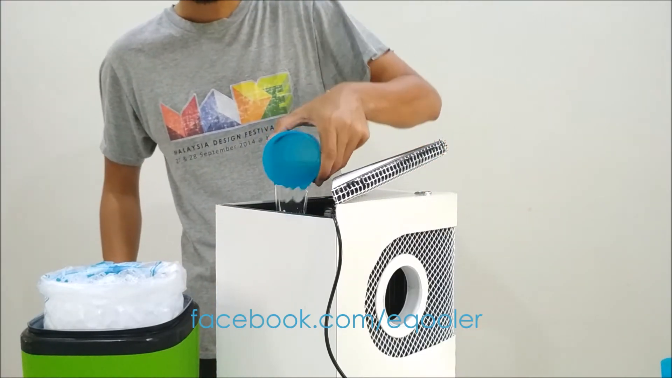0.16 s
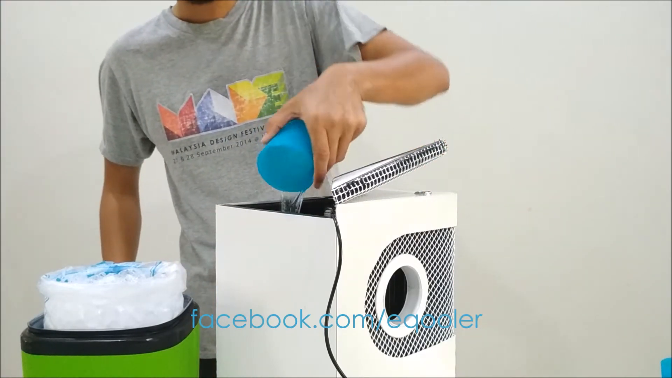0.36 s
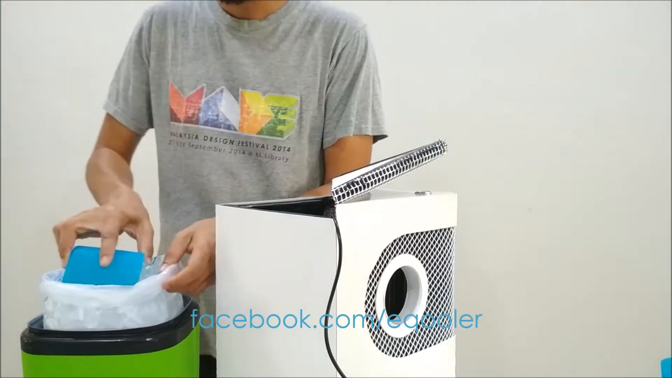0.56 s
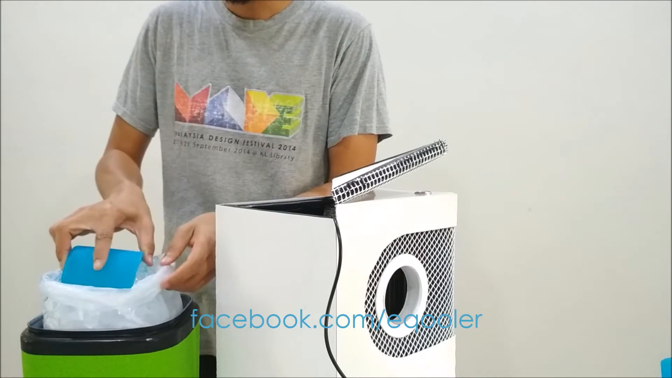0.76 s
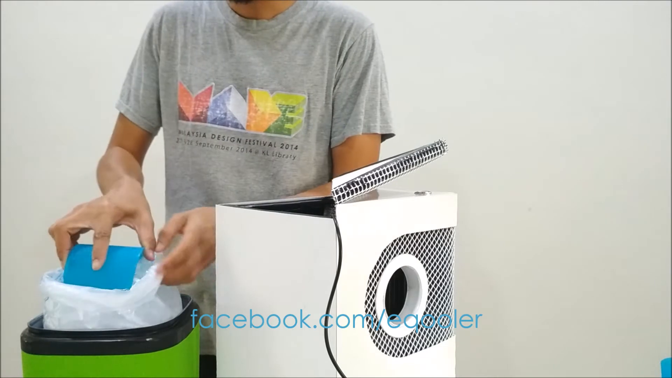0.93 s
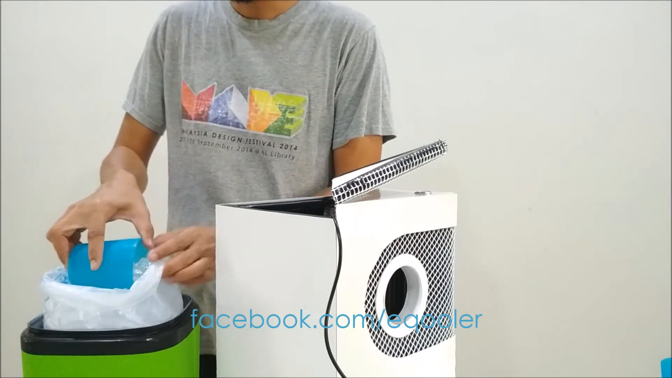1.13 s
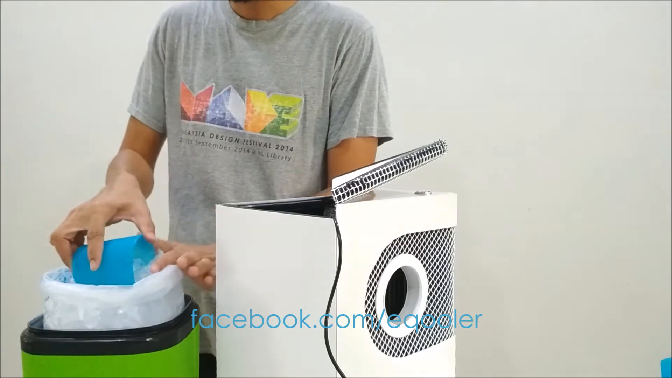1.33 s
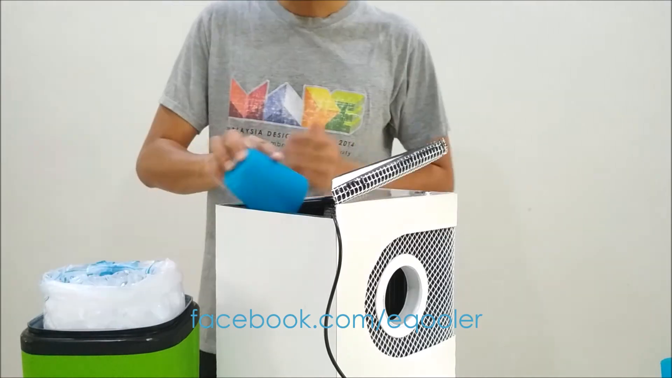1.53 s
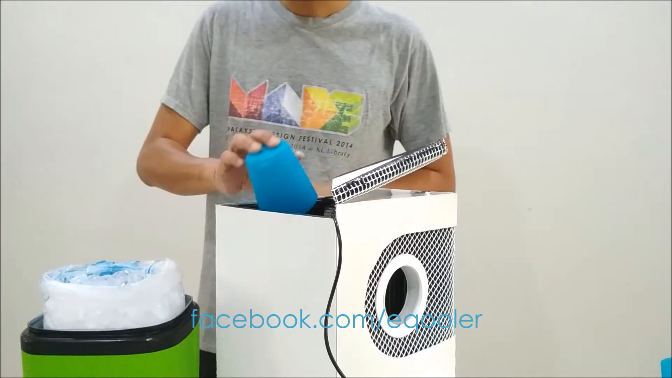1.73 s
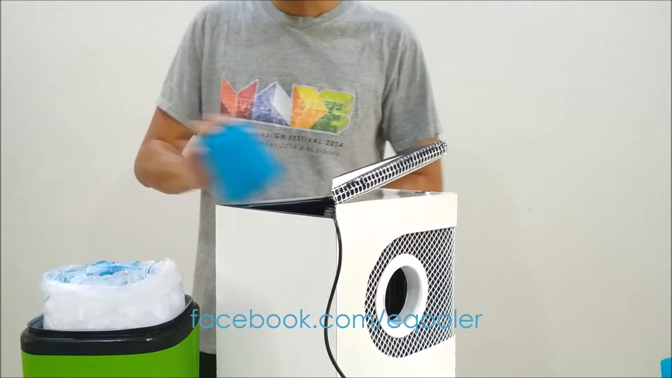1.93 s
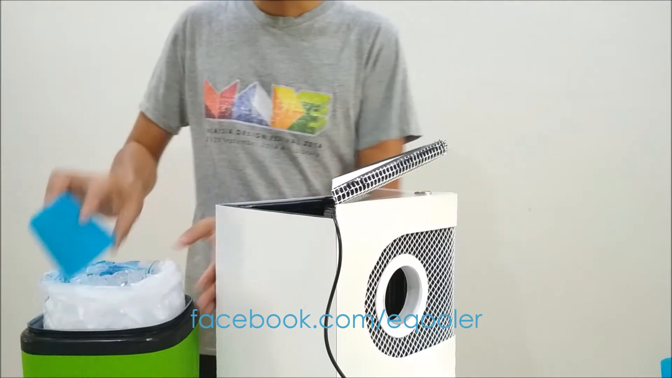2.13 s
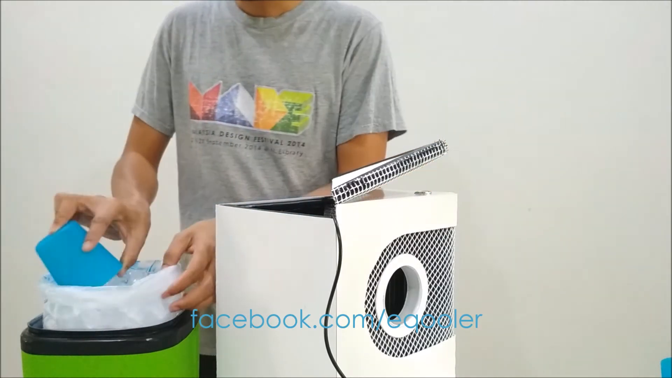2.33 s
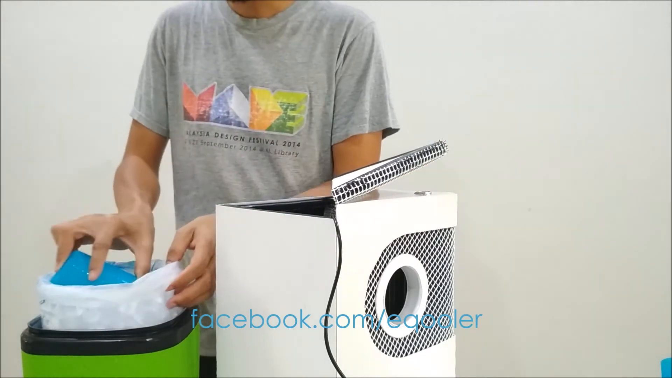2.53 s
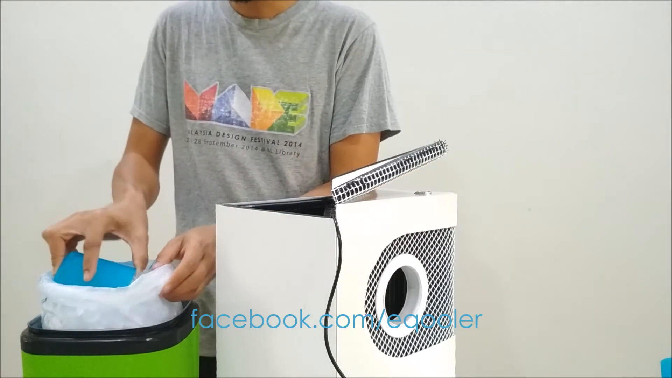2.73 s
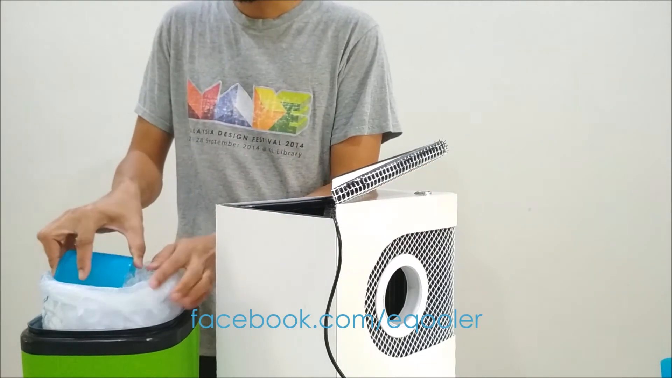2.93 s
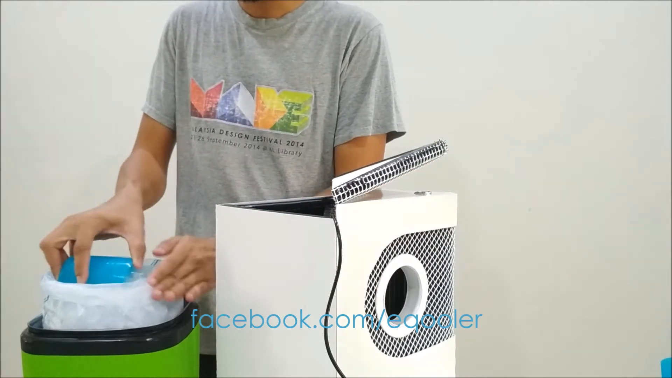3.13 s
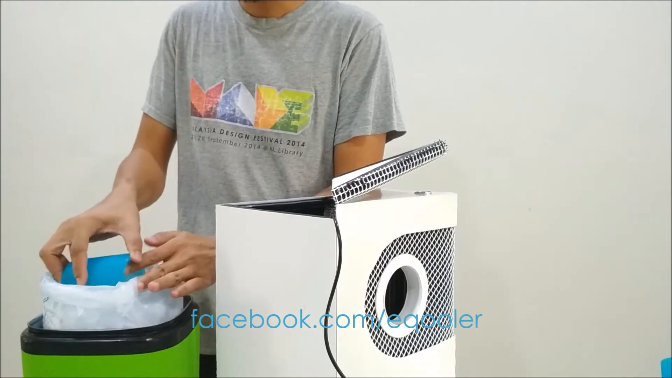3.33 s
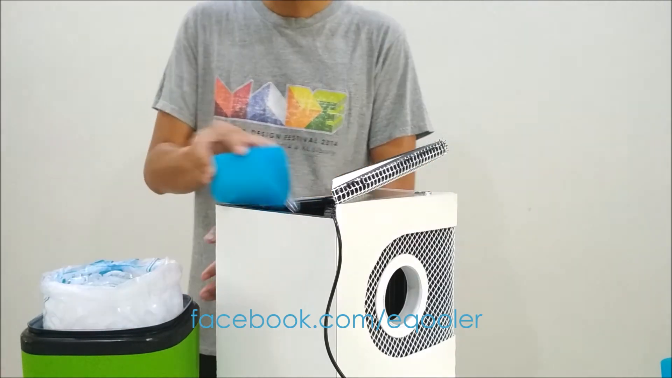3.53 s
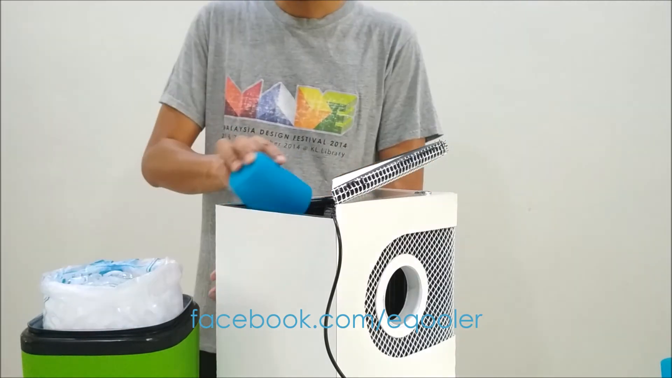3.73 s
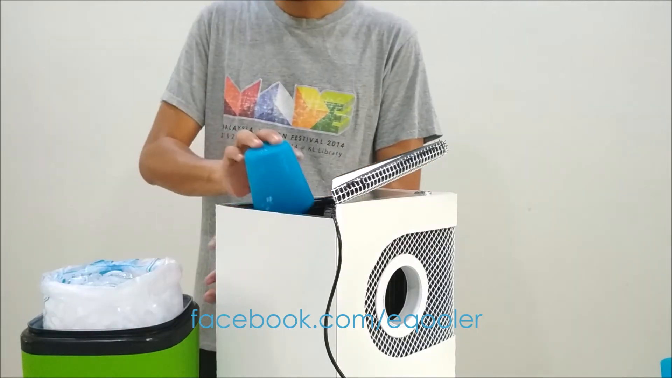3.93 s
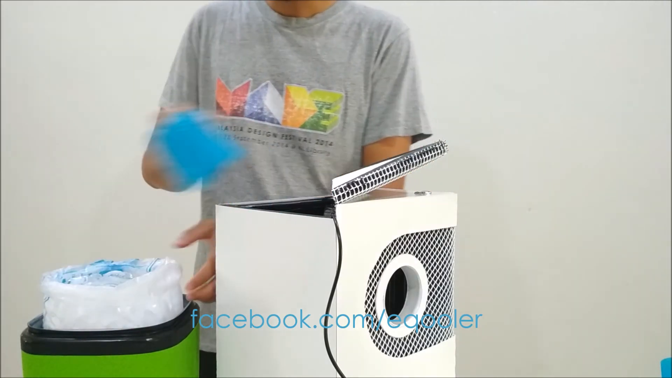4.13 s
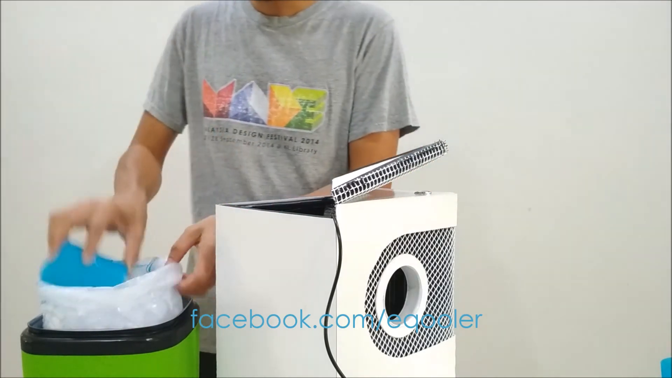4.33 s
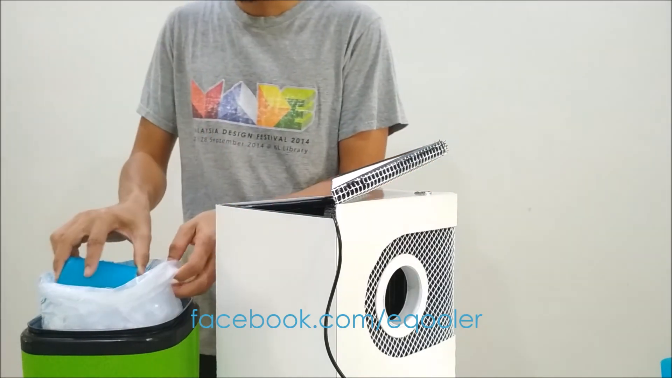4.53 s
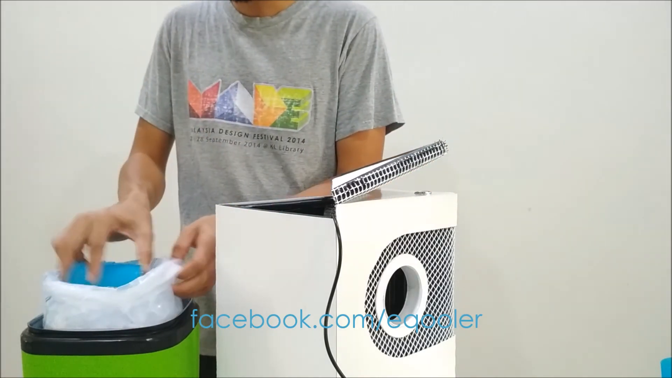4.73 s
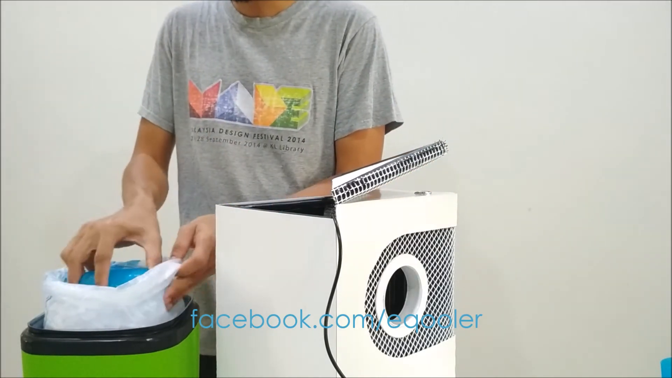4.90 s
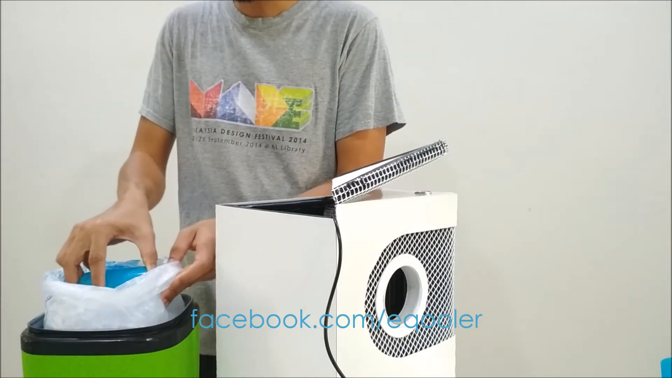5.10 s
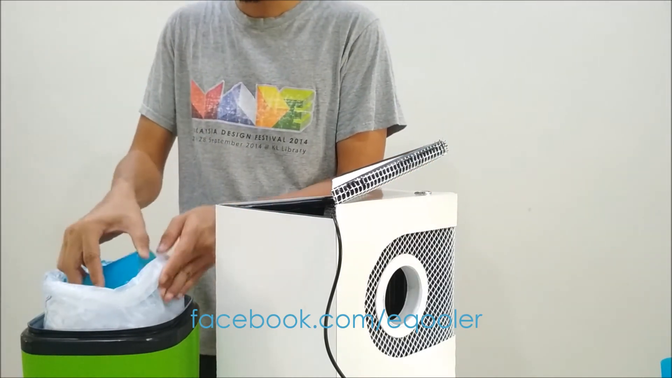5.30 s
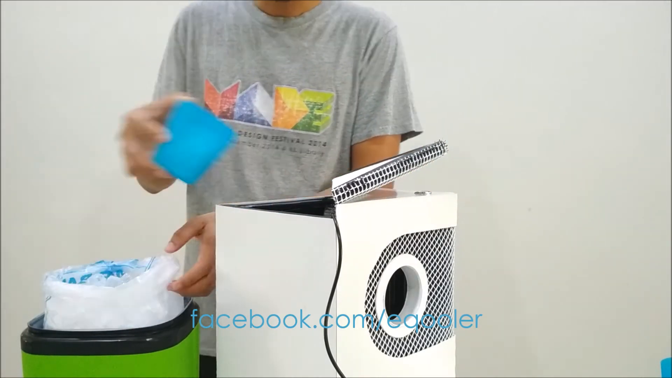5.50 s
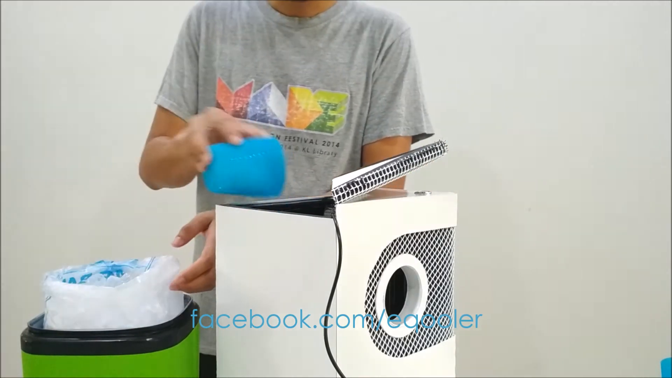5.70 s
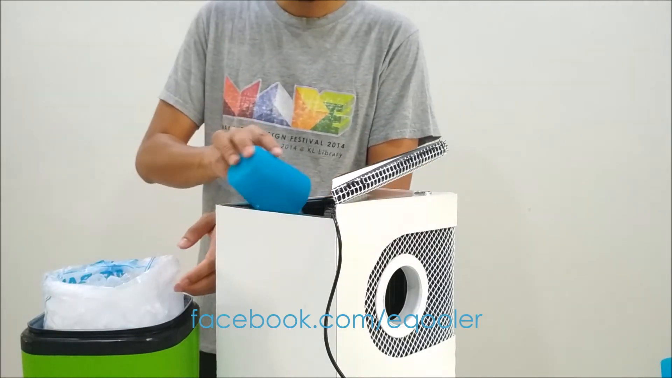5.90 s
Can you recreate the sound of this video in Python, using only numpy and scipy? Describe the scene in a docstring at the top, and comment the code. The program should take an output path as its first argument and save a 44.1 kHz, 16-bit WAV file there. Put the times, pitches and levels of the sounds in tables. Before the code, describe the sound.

Ice slides out of a plastic cup with a few drips of meltwater. The cup then digs into a plastic bag of ice cubes three times, with bright crackling, clinks, sharp cracks and dull knocks on its wall. After each scoop, cubes tumble into a small hollow appliance, twice with a run of thuds, the last time only lightly. It is all close, in a bare room, with a draught softly buffeting the microphone on the left.

```python
"""First comes ice sliding out of a plastic cup, with a draught buffeting the left microphone port.
Close to a handheld recorder in a bare room, the cup is dug into a bag of ice cubes and emptied into a
hollow box, again and again. Ice and bag crackle in dense grains, cubes clink and crack, and the cup hums
and knocks as they rub and strike it. Cubes thud on the box floor; meltwater drips ring as small bubbles."""
import sys
import numpy as np
from scipy import signal
from scipy.fft import rfft, irfft
from scipy.io import wavfile

SR = 44100
rng = np.random.default_rng(int(sys.argv[2]) if len(sys.argv) > 2 else 0)


def unload_wav(signal):
    """Save mono or channel-first audio to the path in sys.argv[1] as 16-bit WAV at rate SR, clipped to [-1, 1]."""
    wavfile.write(
        sys.argv[1],
        SR,
        np.round(np.clip(np.atleast_2d(signal).T, -1, 1) * 32767).astype(np.int16),
    )


N = 266981


def amp(db):
    """Decibels to amplitude."""
    return 10 ** (np.asarray(db) / 20)


def unit_rms(x):
    """Each channel scaled to rms 1."""
    return x / np.sqrt(np.mean(x ** 2, axis=-1, keepdims=True) + 1e-20)


def at_hz(points, hz):
    """Read a curve along a logarithmic frequency axis."""
    return np.interp(np.log(hz + 1), np.log(np.array(points)[:, 0]), np.array(points)[:, 1])


def butter(x, order, hz, kind):
    """Butterworth filter."""
    return signal.sosfilt(signal.butter(order, hz, kind, fs=SR, output="sos"), x)


def colour(x, spectrum):
    """Minimum-phase filter with the given dB spectrum."""
    cepstrum = irfft(at_hz(spectrum, np.linspace(0, SR / 2, 2049)) * np.log(10) / 20)
    cepstrum[1:2048] *= 2
    cepstrum[2049:] = 0
    impulse = irfft(np.exp(rfft(cepstrum)))[:2048]
    return signal.oaconvolve(x, impulse)[:N]


def drift(rate_hz):
    """Slow random wander of spread 1."""
    r = np.exp(-80 * np.pi * rate_hz / SR)
    slow = signal.lfilter([1], [1, -2 * r, r * r], rng.standard_normal(N // 40 + 2002))[2000:]
    return np.interp(np.arange(N) / 40, np.arange(len(slow)), unit_rms(slow))


def grains(per_s, spread_db):
    """Random clicks of uneven size and sign; rms 1."""
    sizes = amp(spread_db * np.minimum(rng.exponential(1, N), 4)) * rng.choice([-1, 1], N)
    return unit_rms(sizes * (rng.random(N) < per_s / SR))


def resonate(x, peaks):
    """Parallel resonances (pitch [Hz], width [Hz], level [dB]) with alternating signs; rms 1."""
    out = 0
    for k, (hz, width_hz, db) in enumerate(peaks):
        r = np.exp(-np.pi * width_hz / SR)
        poles = [1, -2 * r * np.cos(2 * np.pi * hz / SR), r * r]
        out = out + (-1) ** k * amp(db) * (1 - r * r) * signal.lfilter([1, 0, -1], poles, x)
    return unit_rms(out)


def placed(x, lag, roam=0):
    """The left port, farther off, hears the sound lag samples later; a roaming source shifts that lag."""
    read = np.arange(N) - lag - np.round(roam * drift(25)).astype(int)
    return np.array([x[np.clip(read, 0, N - 1)], x])


# Background of the bare room: (frequency [Hz], density [dB])
ROOM_TONE = [(40, -28.5), (300, 11.5), (1000, -4), (4000, -7.5), (11000, -9), (16000, -18)]
def room_tone(level_db=-70):
    """A faint steady hush, separate at each port."""
    hush = np.array([colour(noise, ROOM_TONE) for noise in rng.standard_normal((2, N))])
    return amp(level_db) * unit_rms(hush)


# Ring of the walls around the microphone: (frequency [Hz], t60 [s])
ROOM_DECAY = [(100, 0.19), (500, 0.19), (2000, 0.2), (8000, 0.12), (16000, 0.096)]
def room_echo(x, alike_below_hz=340, first_echo_s=0.003):
    """Reflections die away by octave band; the two ports hear the long waves alike."""
    t, tail = np.arange(SR) / SR, 0
    mid, side = rng.standard_normal((2, SR))
    side = butter(side, 1, alike_below_hz, "high")
    for low in 80 * 2. ** np.arange(8):
        band = butter([mid + side, mid - side], 2, [low, min(2 * low, .45 * SR)], "band")
        t60 = at_hz(ROOM_DECAY, low * np.sqrt(2))
        tail = tail + band * amp(-60 * t / t60) / np.sqrt(t60)
    tail *= np.clip((t - first_echo_s) / 0.00013, 0, 1)
    tail /= np.sqrt(np.sum(tail ** 2) / 2)
    return signal.oaconvolve(x[None], tail, axes=1)[:, :N]


# Rumble of air right on the microphone: (frequency [Hz], density [dB])
WIND_RUMBLE = [(15, -1.5), (40, 0), (80, -3.5), (150, -14.5), (300, -37.5), (600, -80.5)]
# Gusts across the ports: (time [s], level [dB], half-width [s], left over right [dB])
PORT_GUSTS = [(0.0, -27, 0.1, 27), (0.25, -23, 0.072, 24), (0.402, -38, 0.077, 11), (0.563, -32, 0.01, 8),
              (0.667, -39, 0.032, -9), (0.81, -41, 0.029, 13), (0.97, -53.5, 0.19, -1),
              (1.11, -39, 0.066, 11), (1.2, -36, 0.018, 25), (1.27, -31, 0.059, 8),
              (1.411, -36.5, 0.056, 14), (1.54, -49, 0.046, 27), (1.67, -36, 0.097, 8),
              (1.87, -33.5, 0.097, 32), (2.041, -24, 0.04, 26), (2.214, -32.5, 0.046, 21),
              (2.378, -39, 0.036, -13), (2.52, -49.5, 0.11, 14), (2.748, -40.5, 0.032, 20),
              (2.861, -47, 0.025, 23), (2.96, -45, 0.038, -26), (3.07, -48.5, 0.075, -10),
              (3.393, -33, 0.028, 37), (3.47, -37, 0.054, 39), (3.721, -47, 0.024, -5),
              (3.83, -35, 0.031, 14), (4.01, -47, 0.046, 25), (5.431, -55.5, 0.073, -26),
              (5.698, -46.5, 0.057, 22), (5.86, -53.5, 0.043, 20), (6.05, -33.5, 0.055, 16)]
def draught(calm_db=-62):
    """Lumpy low noise, its own on each port; each gust swells and passes, mostly over one port."""
    t, level = np.arange(N) / SR, np.full((2, N), amp(calm_db))
    lumps = [unit_rms(colour(rng.standard_normal(N), WIND_RUMBLE) * amp(2.53 * drift(28)))
             for port in range(2)]
    for s, db, half_s, pan_db in PORT_GUSTS:
        sides = amp([[pan_db / 2], [-pan_db / 2]])
        swell = np.exp(-((t - s) / half_s) ** 2)
        level += amp(db) * 2 * sides / np.linalg.norm(sides) * swell
    return level * lumps


# Meltwater landing on the box floor: (time [s], level [dB], starting pitch [Hz])
MELTWATER = [(.197, -36, 1170), (.375, -37, 590), (.493, -44, 1970)]
def drips(ring_cycles=30, chirp=0.17):
    """Each drop traps a bubble that rings briefly, rising in pitch."""
    t, out = np.arange(SR // 10) / SR, np.zeros(N)
    attack = 1 - np.exp(-t / .001)
    for s, db, hz in MELTWATER:
        age = t * hz / ring_cycles
        ring = amp(db - 60 * age) * np.sin(2 * np.pi * hz * t * (1 + chirp * age))
        out[round(s * SR):round(s * SR) + len(t)] += ring * attack
    return out


# Modes of the hollow box: (pitch [Hz], level [dB], t60 [s])
BOX_MODES = [(141, -28.5, 0.084), (207, -6, 0.056), (342.5, -1.5, 0.042), (435, 2.5, 0.026),
             (513, -0.5, 0.032), (646, 9.5, 0.013), (901, 12, 0.016), (1115, 6, 0.038), (1580, -9, 0.067),
             (1980, -17.5, 0.017), (2670, -13.5, 0.028)]
# Cubes landing in the box, near the microphone's centre line: (time [s], peak [dB], favoured pitch [Hz])
LANDINGS = [(1.554, -31.5, 207), (1.589, -16, 410), (1.623, -26.5, 397), (1.6431, -5, 385),
            (1.660, -25, 400), (1.681, -14, 700), (1.692, -17, 396), (1.700, -8.5, 457),
            (1.714, -11.5, 345), (1.726, -13.5, 496), (1.739, -19, 400), (1.758, -18, 564),
            (1.7762, -10, 480), (1.795, -23, 330), (1.816, -12, 537), (1.829, -18, 456), (1.85, -32, 350),
            (1.877, -27, 500), (1.892, -28, 510), (3.708, -34, 225), (3.786, -17.5, 220), (3.855, -10, 543),
            (3.879, -12, 444), (3.903, -18, 400), (3.920, -17.5, 910), (3.931, -18.5, 344),
            (3.945, -16.5, 500), (3.983, -13.5, 355), (4.008, -16, 420), (4.031, -19.5, 380),
            (4.058, -30, 450), (6.021, -35, 780), (6.031, -32, 507), (6.043, -29.5, 212)]
def box_thuds(contact_hz=700, spot_octaves=0.53):
    """A cube rings the modes its landing spot favours; the soft contact hardly drives the high ones."""
    t, out = np.arange(SR // 5) / SR, np.zeros(N + SR)
    hz, level_db, t60 = np.transpose(BOX_MODES)[:, :, None]
    attack = (1 - np.exp(-t / .0011)) ** 2
    rings = amp(level_db - 60 * t / t60) * np.sin(2 * np.pi * hz * t) * attack
    softness = 1 + (hz[:, 0] / contact_hz) ** 3
    for s, db, spot_hz in LANDINGS:
        favoured = np.exp(-(np.log2(hz[:, 0] / spot_hz) / spot_octaves) ** 2) + amp(-9)
        scatter = 1 + .4 * rng.standard_normal(len(hz))
        thud = (favoured * scatter / softness) @ rings
        out[round(s * SR):round(s * SR) + len(t)] -= amp(db) * thud / np.max(np.abs(thud))
    return out[:N]


# Cubes striking the cup, nearer the right port: (time [s], level [dB], pitch [Hz])
WALL_KNOCKS = [(.600, -24, 860), (2.231, -29, 1150), (2.477, -19.5, 696), (2.492, -19, 816),
               (4.4115, -17.5, 1090), (4.432, -29, 900), (4.439, -23, 856), (4.501, -19.5, 700),
               (4.859, -26, 500), (4.904, -19, 594), (5.036, -23, 875), (5.36, -30.5, 850)]
def cup_knocks(ring_cycles=11):
    """Each knock is a short dull ring of the plastic wall with one overtone."""
    t, out = np.arange(SR // 20) / SR, np.zeros(N)
    attack = 1 - np.exp(-t / .0003)
    for s, db, hz in WALL_KNOCKS:
        ring = np.sin(2 * np.pi * hz * t) + 0.32 * np.sin(2 * np.pi * 1.5 * hz * t)
        decay = amp(db - 60 * t * hz / ring_cycles)
        out[round(s * SR):round(s * SR) + len(t)] -= decay * ring * attack
    return out


# Modes of the cup's wall: (pitch [Hz], width [Hz], level [dB])
CUP_WALL = [(847, 13, 1), (1252, 15, -11)]
# The cup as ice fills and leaves it: (time [s], air pitch [Hz], relative level of the wall [dB])
CUP_FILL = [(0, 752, -9.5), (.58, 790, -0.5), (0.719, 706, 2), (1.15, 743, -7), (1.2, 682, 18),
            (1.3, 726, 4.5), (1.5, 810, 9), (1.65, 696, -13.5), (2.23, 655, 3), (2.38, 766, 7),
            (2.47, 661, -4), (2.6, 690, -7), (2.78, 627, -14), (2.952, 744, 0), (3.099, 758, 7.5),
            (3.35, 780, -5), (3.9, 685, -13.5), (4.42, 722, 10), (4.521, 700, -5), (4.721, 800, -12),
            (4.9, 700, -5), (5.04, 700, -0.5), (5.2, 810, 0.5), (5.33, 640, -1.5), (5.54, 850, 1),
            (5.6, 800, -13), (6.05, 737, -0.5)]
def cup_hum(clumps, air_width_hz=85):
    """Rubbing contacts ring the cup's wall and the air inside it, whose pitch moves."""
    s, air_hz, wall_db = np.transpose(CUP_FILL)
    t, rubbing = np.arange(N) / SR, grains(1500, spread_db=2.5) * clumps
    carrier = np.exp(2j * np.pi * np.cumsum(np.interp(t, s, air_hz)) / SR)
    pole = np.exp(-np.pi * air_width_hz / SR)
    air = (signal.lfilter([1], [1, -pole], rubbing / carrier) * carrier).real   # a gliding resonance
    wall = amp(np.interp(t, s, wall_db) - 5.5) * resonate(rubbing, CUP_WALL)
    return resonate(unit_rms(air) + wall, [(810, 600, 0)])


# Resonances of the ice heap: (pitch [Hz], width [Hz], level [dB])
HEAP_MODES = [(245, 66, 1.5), (345, 34.5, 6.5), (455, 223, -0.5)]
# Air and walls of the box under tumbling ice: (pitch [Hz], width [Hz], level [dB])
BOX_HOLLOW = [(237, 60, -13), (351, 22, 1.5), (437, 45, 2), (511, 33, 5.5)]
def low_crunch(clumps, pouring):
    """Tumbling cubes drive the heap and, during a pour, the hollow of the box."""
    tumbling = grains(500, spread_db=1.0) * clumps
    heap = resonate(resonate(tumbling, HEAP_MODES), [(337, 1280, 0)])
    return (1 - 0.23 * pouring) * heap + 0.76 * pouring * resonate(tumbling, BOX_HOLLOW)


# Ice sliding out sounds hollower than ice dug: (frequency [Hz], gain [dB])
POUR_TONE = [(1000, -4.5), (2000, 1.6), (3500, -3), (6000, -1), (11000, 0.96)]
def clinks(clumps, pouring, tilt_db_per_octave=-0.5, q=52):
    """Cube on cube: sparse clicks dealt to short glassy rings spread over the treble; rms 1."""
    pitches = np.geomspace(980, 7500, 19) * 2 ** rng.uniform(-.07, .07, 19)
    clicks = grains(600, spread_db=1.0) * clumps
    dealt, out = rng.integers(0, len(pitches), N), 0
    for k, hz in enumerate(pitches):
        gain = amp(tilt_db_per_octave * np.log2(hz / 2000) + pouring * at_hz(POUR_TONE, hz))
        out = out + gain * resonate(clicks * (dealt == k) + 1e-18, [(hz, hz / q, 0)])
    return unit_rms(out)


# Ice and bag at close range: (frequency [Hz], density [dB])
CRACKLE_TONE = [(1000, -24.5), (2000, -6), (4000, -5.5), (6000, 0), (9000, 0), (12500, -1.5), (14000, -0.5),
                (15800, -6)]
def crackle(clumps, pouring):
    """Ice and bag give off dense bright grains, hollower during a pour."""
    dug = unit_rms(colour(grains(3000, spread_db=2.5) * clumps, CRACKLE_TONE))
    return (1 - pouring) * dug + pouring * colour(dug, POUR_TONE)


# Shoves of the cup through the bag: (time [s], build-up [s], hold [s], crackle t60 [s],
# relative crackle level [dB], then over the crackle: clink [dB], cup hum [dB], low crunch [dB])
CUP_DIGS = [(0.582, 0.0089, 0.02, 0.97, -26, -5, -6, -9.5),
            (0.765, 0.045, 0.078, 0.41, -33, -11.5, -21, -8.5),
            (0.86, 0.0077, 0.13, 0.9, -38.5, -4, -5.5, -19),
            (0.99, 0.039, 0.073, 0.095, -36.5, -11, -3, -12.5),
            (1.195, 0.031, 0.082, 0.51, -32, -13, -19, -14.5), (1.28, 0.052, 0.011, 1, -61, 13, 7, -15),
            (2.229, 0.0019, 0.086, 0.44, -34, -6, -9, -9.5), (2.34, 0.082, .05, .4, -35, -13, -13, -16),
            (2.44, 0.054, 0.0045, 0.2, -21, -5.5, -12, -11), (2.49, 0.024, 0.036, 1, -28.5, -6, -3.5, -12),
            (2.65, 0.059, 0.061, 0.27, -31.5, -12.5, -9, -22.5),
            (2.853, 0.0056, 0.013, 0.62, -36, -32, -12.5, -19.5),
            (2.93, 0.025, 0.013, 0.95, -34.5, -21, -17, -22),
            (3.069, 0.021, 0.05, 0.77, -35, -26, -16, -23),
            (3.158, 0.1, 0.054, 0.46, -29, -11.5, -16.5, -26), (3.4, 0.019, 0.096, 0.6, -50, -29, -26, -22),
            (4.407, 0.0071, 0.034, 0.26, -32, 0, -6, -20), (4.43, 0.057, 0.015, 1, -28.5, -3.5, -5, -17),
            (4.605, 0.024, 0.022, 0.63, -37, -2.5, -6.5, 1),
            (4.732, 0.0048, 0.0053, 0.29, -37, -12, -17, -12),
            (4.765, 0.012, 0.036, .3, -41.5, -2.5, -30, -12),
            (4.82, 0.04, 0.043, 1, -21.5, -9.5, -8.5, -10), (4.95, 0.024, 0.068, 0.79, -37, 0.5, -6, -14),
            (5.245, .004, 0.083, 0.17, -39, -31, -33.5, -27.5),
            (5.324, 0.029, 0.0066, 0.55, -26, -10, -7.5, -9.5),
            (5.55, 0.007, 0.028, 0.35, -45.5, -38, -37, -38)]
# Ice and meltwater sliding out over the box: same columns
CUP_POURS = [(0.0, 0.001, 0.15, 0.88, -40.5, -4.5, -13.5, -19), (0.33, 0.022, 0.1, 0.52, -41, -8, -20, -25),
             (1.551, 0.003, 0.0043, 0.28, -38, -35, -29, -6.5), (1.59, 0.016, .03, 0.2, -43, -34, 1, 4),
             (1.655, 0.068, 0.048, 0.37, -35.5, 1, -9.5, 9), (1.71, 0.053, 0.062, 0.24, -33.5, -0.5, 2, 3),
             (3.62, 0.016, 0.13, 0.49, -42.5, -15.5, -27, -48),
             (3.755, 0.032, 0.027, 0.36, -37.5, -7, -32, 1), (3.84, 0.017, 0.0038, 0.09, -33, 2, 3, -15),
             (3.865, 0.068, 0.033, 0.24, -33, 0.5, 3.5, 5.5), (3.96, 0.021, 0.067, 0.32, -33, -1.5, -8, 2),
             (5.82, 0.061, 0.01, 0.79, -44, -19, -36, -36),
             (5.856, 0.061, 0.44, 0.58, -33.5, -31, -29, -35), (6.0, 0.056, .02, 1, -35.5, -0.5, -0.5, -14)]
def cup_strokes(swell=0.82):
    """Strokes build, hold and die away: gains of crackle, clink, hum and crunch, then the poured share."""
    t = np.arange(0, N + 64, 64) / SR
    dug, poured = np.full((2, 4, len(t)), 1e-20)
    # By layer: lingering stretches the t60; settling above 1 steepens the fall as the ice comes to rest.
    for power, strokes, lingering, settling in [
            (dug, CUP_DIGS, [1, 0.62, 0.73, 0.44], [0.99, 0.99, 1, 1]),
            (poured, CUP_POURS, [1, 1, 1.9, 1.96], [1.6, 1.6, 1, 1])]:
        for s, build_s, hold_s, t60, db, *over_db in strokes:
            levels = amp(db + np.vstack([0, *over_db]))
            rise = np.clip((t - s) / build_s, 0, 1) ** swell
            age = np.maximum(t - s - build_s - hold_s, 0) / (t60 * np.vstack(lingering))
            fall = amp(-60 * age ** np.vstack(settling))
            power += (levels * rise * fall) ** 2
    total = dug + poured
    return [np.interp(np.arange(N) / SR, t, curve) for curve in [*np.sqrt(total), poured[0] / total[0]]]


def stirred_ice(gains, level_db):
    """One spot in the moving ice: its crackle and its softer contacts come in the same clumps."""
    crackle_gain, clink_gain, hum_gain, crunch_gain, pouring = gains
    clumps = amp(1.35 * drift(15.8) + 0.35 * drift(55))
    layers = crackle_gain * crackle(clumps, pouring)
    layers += crunch_gain * low_crunch(clumps, pouring)
    layers += clink_gain * clinks(clumps, pouring)
    layers += hum_gain * cup_hum(clumps)
    return amp(level_db) * layers


# Single loud cracks close to the microphone:
# (time [s], peak of the top treble [dB], echo over the crack [dB], body over the treble [dB])
ICE_CRACKS = [(0.5823, -16, -1, -6.5), (0.6093, -9, 0, -16), (0.649, -19, -5.5, -13), (0.6955, -9, -6, -31),
              (0.7844, -20, -6, -14), (0.81, -14.5, 6.5, -12.5), (0.853, -17, -8, -13),
              (0.8768, -17, 3, -8), (0.951, -12.5, -5, -17), (0.9668, -18, -9, -5), (0.986, -16, 1, -18),
              (1.0244, -17, -6, -22), (1.038, -14.5, -12, -20), (1.062, -19, -3, -9),
              (1.1968, -23.5, 9, -15), (1.2488, -16, -10, -7), (1.279, -21, -6, -25), (1.292, -20, 3, -29),
              (1.324, -14, 0, -39), (1.3394, -16, -3, -14), (1.552, -27, 9, -35), (1.681, -19.5, -8.5, -17),
              (1.7794, -18, -5, -19), (2.232, -17.5, -18, -2), (2.249, -17, -2, -9), (2.374, -18, -12, -24),
              (2.414, -22.5, -3, -5), (2.487, -8.5, -8, -18.5), (2.6844, -19, -8, -24),
              (2.703, -17, -2, -16.5), (2.725, -21.5, 3, -5.5), (2.745, -23, -3, -14), (2.77, -17.5, 1, -7),
              (2.8528, -12.5, -4, -34), (2.9475, -17, -13, -29), (2.957, -26, -5, -23),
              (2.967, -15, -8, -17), (3.0066, -19, -5, -15), (3.0946, -24, -9, -13),
              (3.1271, -21, -10, -20), (3.1382, -26, -4, -30), (3.1525, -18, -2, -30),
              (3.1637, -15, -3, -29), (3.1782, -14, -7, -32), (3.2095, -9.5, -7, -21),
              (3.2526, -19, -12, -19), (3.2593, -17, -8, -9), (3.3059, -22, -9, 3),
              (3.389, -20, -12, -25.5), (3.6236, -27.5, -8, -18.5), (3.9856, -19, 0, -7),
              (4.4229, -9, -15, -17.5), (4.4338, -18, 1, -8), (4.4622, -16, -2, -11), (4.4933, -22, 0, -22),
              (4.5, -6.5, -22, -18), (4.574, -14, -13, -14), (4.635, -25, -2, -3), (4.683, -19, -10, -18),
              (4.703, -18.5, -8, -11.5), (4.731, -8, -16, -23.5), (4.7517, -26.5, -4, -5),
              (4.8341, -16, -5, -3), (4.8612, -6, -4, -13), (5.032, -11.5, -1, -27),
              (5.2033, -18.5, -9, -18), (5.2448, -15, -8, -32), (5.2932, -21, -12, -25),
              (5.311, -23.5, -4, -22), (5.3603, -23, -8, -6.5), (5.57, -23.5, -0.5, -36),
              (5.6047, -28.5, -1, -32), (5.86, -27, 0, -19), (5.944, -14, -7, -35), (5.962, -15, -11, -26)]
def ice_cracks(snap_t60=0.004, body_t60=0.006, echo_s=0.0027):
    """Each crack is a bright snap, different at each port, and a duller body, echoed off the table."""
    t, out = np.arange(SR // 20) / SR, np.zeros((2, N + SR))
    noise = rng.standard_normal((len(ICE_CRACKS), 3, len(t))) * (1 - np.exp(-t / .0005))
    snaps = signal.lfilter([1, -0.9], [1], noise[:, :2] * amp(-60 * t / snap_t60))   # tilted to the treble
    snaps = butter(snaps, 3, 5200, "high")
    top_treble = butter(snaps, 1, [6000, 18000], "band")
    snaps /= np.max(np.abs(top_treble), axis=2, keepdims=True)
    bodies = butter(noise[:, 2] * amp(-60 * t / body_t60), 2, [900, 3500], "band")
    for (s, db, echo_db, body_db), snap, body in zip(ICE_CRACKS, snaps, bodies):
        body = amp(body_db) * body / np.max(np.abs(body))
        burst = amp(db) * (snap + [np.roll(body, 8), body])   # the body reaches the left port later
        onset = round(s * SR)
        for start, gain in (onset, 1), (onset + round(echo_s * SR), amp(echo_db)):
            out[:, start:start + len(t)] += gain * burst
    return out[:, :N]


# Resonance of the air plug in the right microphone port: (frequency [Hz], gain [dB])
PORT_RESONANCE = [(2400, 1), (5000, 0.5), (7500, -1), (9500, 6), (11400, 12.5), (13000, 5.5), (14500, -1.5),
                  (16000, 4)]
def scene(room_db=-5):
    """Ice, cup and box a little right of centre, the room around them, the draught on the ports."""
    gains = cup_strokes()
    ice = [stirred_ice(gains, level_db=-7) for spot in range(3)]
    cracks, cup, box = ice_cracks(), cup_knocks(), box_thuds() + drips()
    direct = sum(placed(spot, lag, roam=3) for spot, lag in zip(ice, (8, 3, 11)))
    direct += cracks + placed(cup, lag=8) + placed(box, lag=2)
    into_room = sum(ice) + amp(-3) * (cracks[1] + cup) + amp(-2) * box
    left, right = direct + room_tone() + amp(room_db) * room_echo(into_room)
    return [left, colour(right, PORT_RESONANCE)] + draught()


def record(dry):
    """The loudest peaks are softly rounded, and the handheld recorder cuts the top treble."""
    ceiling, cutoff_hz = 0.9, 16150
    rounded = ceiling * np.tanh(dry / ceiling)
    return signal.sosfilt(signal.cheby2(16, 60, cutoff_hz, fs=SR, output="sos"), rounded)


dry = scene()
out = record(dry)
unload_wav(out)
```